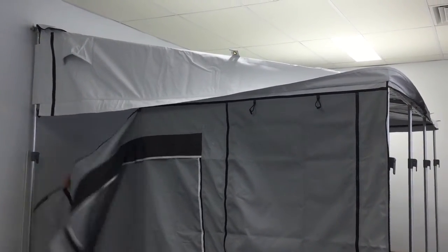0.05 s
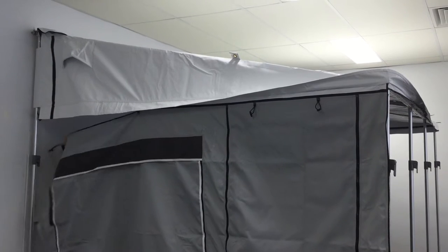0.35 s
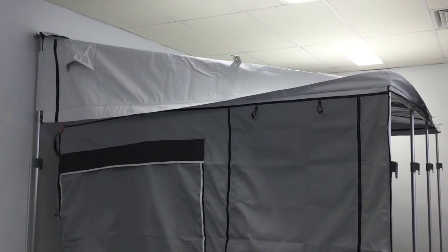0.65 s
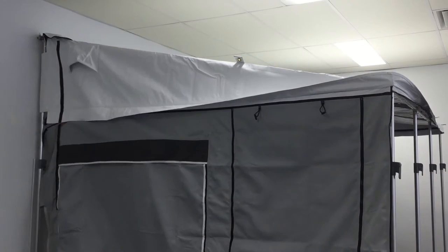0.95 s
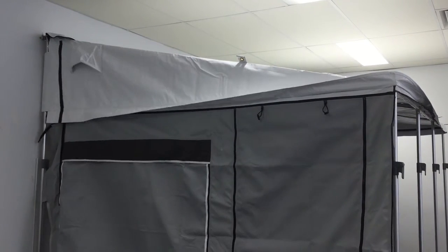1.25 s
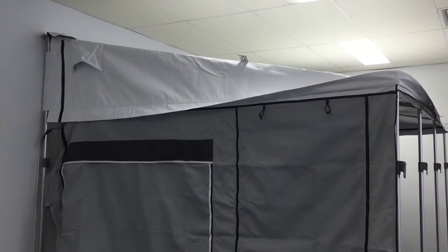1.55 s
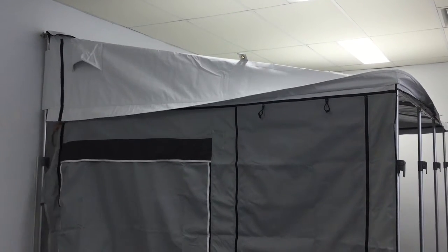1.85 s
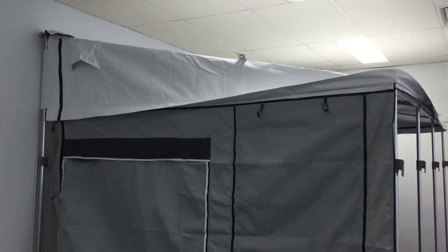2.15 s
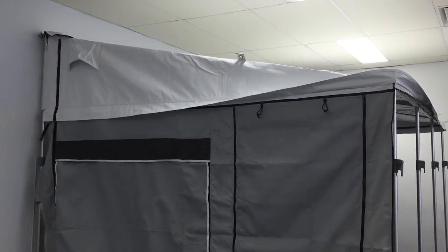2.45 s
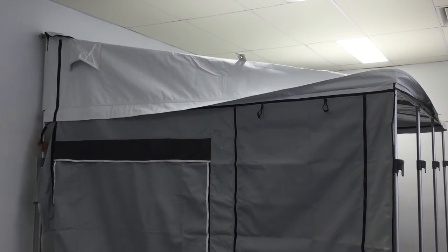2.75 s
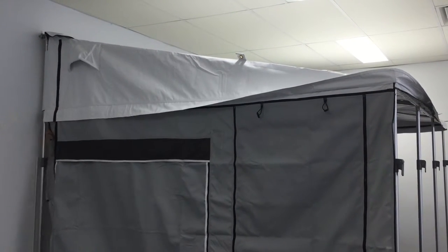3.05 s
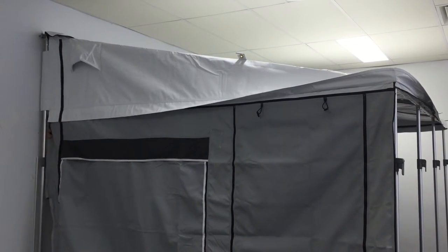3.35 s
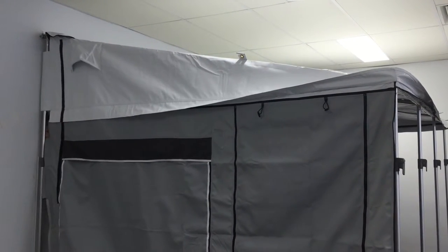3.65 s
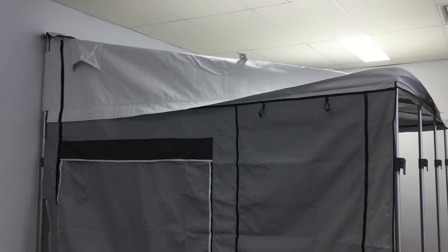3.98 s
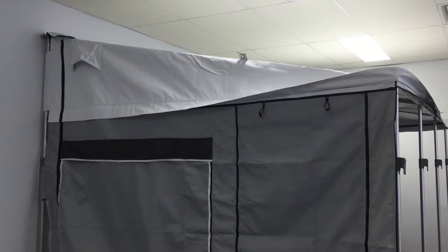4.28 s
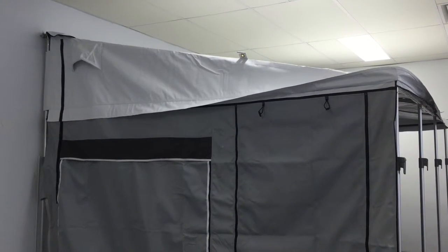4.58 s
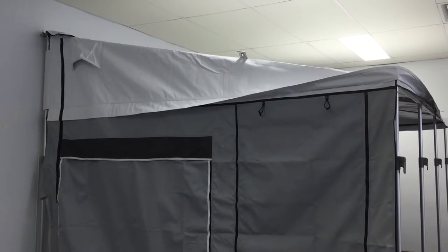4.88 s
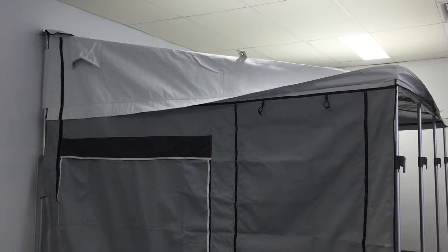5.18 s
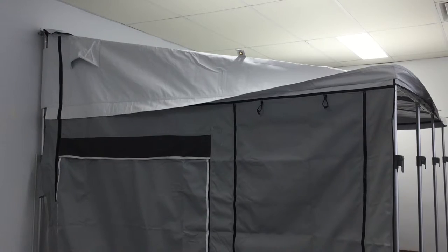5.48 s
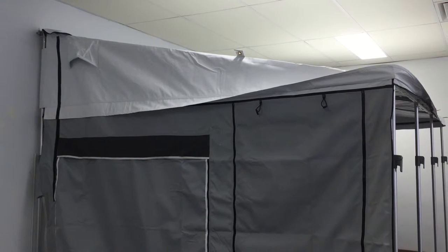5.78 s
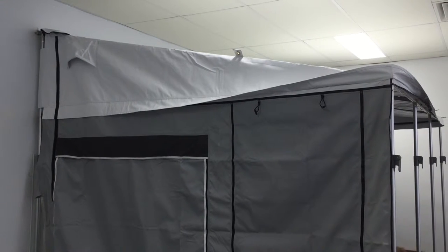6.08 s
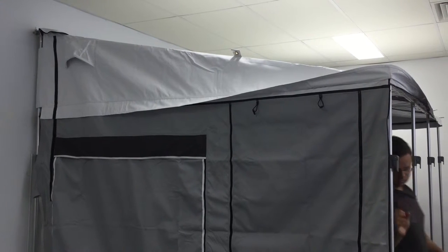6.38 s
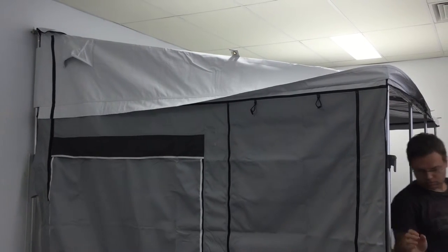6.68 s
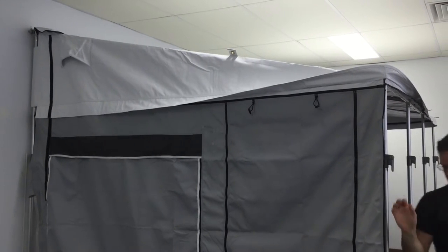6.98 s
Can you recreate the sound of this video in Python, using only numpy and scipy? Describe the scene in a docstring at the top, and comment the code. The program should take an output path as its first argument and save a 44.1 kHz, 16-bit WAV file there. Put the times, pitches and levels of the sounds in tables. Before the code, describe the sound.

A few metres away in a large room, a zip closes a canvas tent wall in three uneven pulls. The first is the longest and loudest, the second slow and quieter, the third speeds up. The stretched canvas buzzes while metal pull tabs jingle and clink and the cloth rustles. The tent frame takes one soft knock, then a small dry tick and light crinkles follow. Soft low thumps and faint ventilation rumble lie beneath.

```python
"""A zip closes a canvas tent wall in three uneven pulls, a few metres away in a large room.
The slider trips over the teeth and the stretched canvas radiates the buzz; two metal pull tabs jingle
and clink. The handled cloth rustles and crinkles, the frame takes one soft knock, and a small dry tick
follows. Beneath are soft low thumps, probably footsteps, and rumbling ventilation."""
import sys
import numpy as np
from scipy import signal
from scipy.fft import rfft, irfft, next_fast_len
from scipy.io import wavfile
from scipy.ndimage import uniform_filter1d, map_coordinates

SR = 44100
rng = np.random.default_rng(int(sys.argv[2]) if len(sys.argv) > 2 else 0)


def digitize_waveform(pressure):
    """Quantize a signal to 16-bit integers and store it at the path in sys.argv[1].

    Rows of a 2-D input are taken as channels; values are limited to [-1, 1].
    """
    field = np.atleast_2d(pressure).T
    bounded = np.clip(field, -1, 1)
    quanta = np.round(bounded * 32767).astype(np.int16)
    wavfile.write(sys.argv[1], SR, quanta)


N = 314433

# modes of held slider tab, second tab, free-hanging slider tab: f/Hz, level/dB, t60/s
TAB_MODES = [
    [(4924, -10.5, 0.23), (5050, -18, .04), (6360, -24, 0.1), (7000, -22, 0.12), (11600, -4.5, 0.24),
     (11620, 0.5, 0.19), (14815, -4, 0.22)],
    [(8233, -4, 0.33), (8330, -13, 0.14), (8320, -7, .1), (8570, -10, 0.098), (9160, -12.5, 0.12),
     (11200, -24, 0.15)],
    [(4854, -4.5, 0.32), (5835, -12, .09), (6240, -12, .14), (6990, -12, .14), (10100, -13, 0.072),
     (11500, -0.5, 0.19), (12800, -15, .06), (14760, -8, 0.24)],
]
# slack canvas panel response: f/Hz, level/dB
SLACK_PANEL = [(32, -21), (60, 3), (110, -0.5), (165, 0), (270, 2), (330, -1), (450, -9), (800, -10),
               (2000, -34.5), (4000, -73)]
# tooth rasp spectrum: f/Hz, level/dB
RASP_SPECTRUM = [(2200, -30.5), (3300, -6), (4300, -5), (6000, -2), (10400, -10), (12500, -11.5),
                 (15500, -8.5)]
TUG_RISE_DB_PER_S, RASP_FALL_DB_PER_S = 381, 236
SHAKE_HOLD_S, SHAKE_RISE_DB_PER_S = 0.0048, 901


def amp(db):
    """Decibels to gain."""
    return 10 ** (np.asarray(db) / 20)


def unit(x):
    """Scale to rms 1."""
    return x / np.sqrt(np.mean(x ** 2) + 1e-20)


def along(points, hz):
    """Interpolate (f/Hz, value) points over log frequency."""
    f, v = np.transpose(points)
    return np.interp(np.log(hz + 1), np.log(f + 1), v)


def wobble(rate_hz):
    """Smooth random curve, knots at rate_hz."""
    knots = rng.standard_normal(int(N * rate_hz / SR) + 4)
    return map_coordinates(knots, [np.arange(N) * rate_hz / SR])


def colour(x, spectrum):
    """Minimum-phase filter from (f/Hz, level/dB) points."""
    m = 2 * next_fast_len(len(x))
    cepstrum = irfft(np.log(amp(along(spectrum, np.fft.rfftfreq(m, 1 / SR)))), m)
    cepstrum[1:m // 2] *= 2
    cepstrum[m // 2 + 1:] = 0
    return irfft(rfft(x, m) * np.exp(rfft(cepstrum)), m)[:len(x)]


def noise(n, spectrum):
    """Coloured noise, rms 1."""
    return unit(colour(rng.standard_normal(n), spectrum))


def fade(t, t60_s):
    """Free decay, 60 dB down at t60_s."""
    return np.exp(-np.log(1000) * t / t60_s)


def swell(start_s, hold_s, rise_db_per_s, fall_db_per_s):
    """Gesture envelope: 1 from start_s for hold_s, flanks linear in dB."""
    corners_s = [start_s - 1, start_s, start_s + hold_s, start_s + hold_s + 1]
    return amp(np.interp(np.arange(N) / SR, corners_s, [-rise_db_per_s, 0, 0, -fall_db_per_s]))


def ring(modes, t, scatter_db):
    """Damped modes struck at randomised levels."""
    return sum(amp(db + scatter_db * rng.normal()) * fade(t, t60_s) * np.sin(2 * np.pi * hz * t)
               for hz, db, t60_s in modes)


def add(track, start_s, sound):
    """Mix sound into track at start_s."""
    part = track[round(start_s * SR):][:len(sound)]
    part += sound[:len(part)]


def grains(rate_hz, spread_db):
    """Random tiny contacts of uneven size, rms 1."""
    impulses = (rng.random(N) < rate_hz / SR) * rng.choice([-1, 1], N)
    return unit(impulses * amp(spread_db * np.clip(rng.standard_normal(N), -2, 2)))


def chatter(modes, rate_hz, damping_t60_s):
    """Modes with extra damping, kept ringing by random light contacts; rms 1."""
    out, t = np.zeros(N), np.arange(SR // 4) / SR
    contacts = rng.random(N) < rate_hz / SR
    for mode in modes:
        strikes = contacts * rng.standard_normal(N)
        out += signal.oaconvolve(strikes, ring([mode], t, 0) * fade(t, damping_t60_s))[:N]
    return unit(out)


def ventilation(level_db=-68):
    """Steady low rumble under faint hiss."""
    # moving air: f/Hz, level/dB
    air_spectrum = [(20, -46), (41, -25.5), (64, -3.5), (259, -21.5), (400, -23.5), (1000, -26.7),
                    (2050, -26.5), (2300, -28.5), (15400, -42)]
    return amp(level_db) * noise(N, air_spectrum)


def rustle(rustle_db=-9, scuff_db=-1.5, clump_db=2, loose_db=-57.5, loose_until_s=2.65):
    """Canvas rubs in clumps of fine grains; cloth and moving slider add short scuffs near 2 kHz."""
    # scuffs and scrapes of canvas and slider: t/s, level/dB, f/Hz
    scrapes = [(.74, -62.5, 1790), (.86, -45, 1840), (1.61, -58.5, 2380), (1.66, -63, 2017),
               (1.88, -65, 2002), (2.18, -50.5, 1780), (2.717, -60.5, 2020), (2.88, -69, 1780),
               (3.024, -60.5, 1630), (3.325, -46, 1970), (3.39, -47.5, 2005), (3.785, -63, 1997),
               (4.465, -60.5, 2220), (5.535, -70.5, 1300), (6.565, -68.5, 2840)]
    # scuff spectrum: multiple of scuff f, level/dB
    scuff_shape = [(.3, -21.5), (.8, -14), (1, -2), (1.25, -18.5), (3, -27.5), (8, -41)]
    # rubbing cloth: f/Hz, level/dB
    cloth_spectrum = [(150, 5.5), (400, -5), (1400, -4), (2000, -2), (3000, -13.5), (6000, -14),
                      (15000, -23.5)]
    flanks_db_per_s = 400, 340
    fibres = grains(rate_hz=1500, spread_db=2.5)
    rubbing = amp(loose_db) * swell(0, loose_until_s, *flanks_db_per_s)  # until the zip holds the wall
    scuffs = np.zeros(N)
    for s, db, hz in scrapes:
        stroke = amp(db) * swell(s, 0.015, *flanks_db_per_s)
        rubbing = np.maximum(rubbing, stroke)
        near = slice(round(s * SR) - SR // 5, round(s * SR) + SR // 4)
        scuffs[near] += stroke[near] * unit(colour(fibres[near], np.array(scuff_shape) * [hz, 1]))
    cloth = rubbing * unit(colour(fibres, cloth_spectrum))
    return amp(clump_db * wobble(22.11)) * (amp(rustle_db) * cloth + amp(scuff_db) * scuffs)


def thumps(centre_hz=72.6, sigma_s=0.018):
    """Soft low thumps, probably footsteps."""
    # thumps: t/s, level/dB
    thump_events = [(.115, -55.5), (.336, -54), (1.58, -51.5), (1.76, -55), (2.935, -58.5), (5.755, -60)]
    out, t = np.zeros(N), np.arange(N) / SR
    for s, db in thump_events:
        hz = centre_hz * np.exp(0.12 * rng.normal())
        envelope = np.exp(-((t - s) / sigma_s) ** 2 / 2)
        out += amp(db) * envelope * np.sin(2 * np.pi * (hz * (t - s) + rng.random()))
    return out


def crinkles(snap_db=-10, flap_db=-13, rise_s=0.0017, t60_s=0.13):
    """A crease gives way: papery snap, short crack, low flap."""
    # creases: t/s, level/dB, centre f/Hz, flap offset/dB
    creases = [(.331, -56.5, 885, 13), (1.598, -37, 2150, -30), (1.917, -39, 1550, -10),
               (3.184, -32.5, 1640, -28), (4.188, -49, 1773, -7), (4.46, -51, 2240, 8.5),
               (5.365, -51, 1370, -9), (5.975, -49, 1100, -2.5), (6.008, -52, 3980, -4),
               (6.548, -47.5, 1500, -24)]
    out, t = np.zeros(N), np.arange(SR // 4) / SR
    for s, db, hz, offset_db in creases:
        spectrum = [(hz * 0.39, -18), (hz * 0.86, -6), (hz, 0), (hz * 1.19, -7),
                    (hz * 1.73, -20), (hz * 3, -27), (16000, -46)]
        snap = noise(len(t), spectrum) * fade(t, t60_s)
        crack = colour(rng.standard_normal(len(t)) * fade(t, 0.031), spectrum)
        flap = noise(len(t), SLACK_PANEL) * fade(t, t60_s)
        pop = amp(snap_db) * snap + crack / np.abs(crack).max() + amp(flap_db + offset_db) * flap
        add(out, s, amp(db) * pop * (1 - np.exp(-t / rise_s)))
    return out


def tooth_rate_hz():
    """Teeth passing the slider per second, at each sample."""
    # slider speed, one list per pull: t/s, tooth rate/Hz
    pulls = [
        [(.78, 190), (.83, 215), (.865, 260), (.96, 300), (1.01, 274), (1.045, 312), (1.1, 368), (1.135, 338),
         (1.18, 362), (1.22, 330), (1.3, 295), (1.38, 140), (1.54, 72)],
        [(1.9, 73), (2.1, 86), (2.18, 119), (2.27, 106), (2.38, 92)],
        [(3.1, 95), (3.27, 120), (3.39, 172), (3.478, 155), (3.495, 254), (3.54, 260), (3.58, 284), (3.76, 177)],
    ]
    return np.interp(np.arange(N) / SR, *np.concatenate(pulls).T)


def tugging(thrum_fall_db_per_s=120, buzz_fall_db_per_s=157):
    """Zip gains and roughness: the strongest tug leads; as the hand eases, the highs go first."""
    # tugs within the pulls: t/s, hold/s, thrum/dB, buzz/dB, rasp/dB, roughness
    tugs = [(0.808, 0.021, -40.5, -39.5, -48, 0.74), (0.849, 0.018, -41.5, -33.5, -46.5, 0.64),
            (0.937, 0.045, -40, -41.5, -45.5, 0.67), (1.019, 0.055, -43, -39, -46, 0.41),
            (1.073, 0.14, -43, -36.5, -45, 0.4), (1.219, 0.031, -34, -30, -42, 0.83),
            (1.273, 0.014, -36, -31, -46.5, 0.79), (1.334, 0.022, -42.5, -48, -53, 1.06),
            (1.45, 0.028, -55, -53.5, -94, 0.98), (1.542, 0.018, -58, -58, -60, 0.8),
            (1.928, .012, -51.5, -54.5, -71, 1.04), (2.021, 0.051, -48.5, -50, -72, .9),
            (2.095, 0.075, -49, -44.5, -70, .75), (2.155, 0.058, -49, -44.5, -61.5, 0.55),
            (2.26, 0.0084, -53, -52, -67, 0.64), (3.133, 0.025, -56, -55, -82, 0.83),
            (3.186, 0.021, -52.5, -53, -61, 0.88), (3.314, 0.12, -50, -49, -55.5, 0.6),
            (3.494, 0.085, -43.5, -47.5, -46, 0.77)]
    thrum, buzz, rasp, weight, rough = np.zeros((5, N))
    for s, hold_s, thrum_db, buzz_db, rasp_db, roughness in tugs:
        force = amp(buzz_db) * swell(s, hold_s, TUG_RISE_DB_PER_S, buzz_fall_db_per_s)
        low = amp(thrum_db) * swell(s, hold_s, TUG_RISE_DB_PER_S, thrum_fall_db_per_s)
        high = amp(rasp_db) * swell(s, hold_s, 0.83 * TUG_RISE_DB_PER_S, RASP_FALL_DB_PER_S)
        thrum, buzz, rasp = np.maximum(thrum, low), np.maximum(buzz, force), np.maximum(rasp, high)
        weight += force ** 2
        rough += roughness * force ** 2
    return thrum, buzz, rasp, np.clip(rough / weight, 0, 1)


def zipper(thrum_gain, buzz_gain, rasp_gain, rough, jitter=0.09, tooth_spread_db=1.5, scrape_db=7):
    """Each tooth drives the canvas with a tick and a short scrape."""
    # taut panel response: f/Hz, level/dB
    taut_panel = [(50, -16.5), (100, -4), (270, 2), (550, -0.5), (1300, -9.5), (6500, -69.5)]
    # canvas buzz: f/Hz, level/dB
    buzz_spectrum = [(200, -33.5), (450, -12.5), (620, 4), (740, 3.5), (830, -2), (1250, 1.5), (1800, 1),
                     (2200, -4), (2900, -13), (9000, -66)]
    rate_hz = tooth_rate_hz()
    travel = np.cumsum(rate_hz * (1 + jitter * rough * wobble(130))) / SR
    tooth = travel.astype(int)
    size = amp(tooth_spread_db * rough * rng.standard_normal(N)[tooth])
    ticks = unit(np.diff(tooth, prepend=0) * size / np.sqrt(rate_hz))
    scrape = unit(size * np.exp(-(travel % 1) / 2.2) * rng.standard_normal(N))
    friction = amp(scrape_db) * rough
    drive = (ticks + friction * scrape) / np.hypot(1, friction)
    drive -= uniform_filter1d(drive, size=SR // 50)  # steady push is silent
    taut = np.clip((rate_hz - 130) / 130, 0, 1)  # a fast pull tightens the panel
    thrum = (1 - taut) * unit(colour(drive, SLACK_PANEL)) + taut * unit(colour(drive, taut_panel))
    buzz = unit(colour(drive, buzz_spectrum))
    rasp = unit(colour(0.18 * ticks + scrape, RASP_SPECTRUM))
    snag = amp(1.52 * wobble(45))  # slider catches and frees itself
    return snag * (amp(-1) * thrum_gain * thrum + buzz_gain * buzz + amp(-1) * rasp_gain * rasp)


def jingle(rasp_gain, teeth_db=-8, jingle_db=-3, scratch_db=-11, swing_db=1.5):
    """The held tab chatters on the slider, which damps it; gentle shaking favours its lowest modes."""
    # shakes of the tab: t/s, bright jingle/dB, low ring/dB
    shakes = [(.829, -39, -60), (.953, -42, -48), (1.3, -37.5, -51), (1.385, -52.5, -61), (1.667, -74, -67),
              (1.94, -72, -65), (2.072, -72, -61), (2.1, -53.5, -54), (2.185, -53.5, -70), (2.24, -64, -60),
              (2.29, -65.5, -65.5), (3.285, -61, -57), (3.385, -54.5, -56), (3.6, -40.5, -51),
              (3.7, -66, -64)]
    bright_gain, low_gain = amp(teeth_db) * rasp_gain, np.zeros(N)  # passing teeth keep it trembling
    for s, bright_db, low_db in shakes:
        burst = swell(s, SHAKE_HOLD_S, SHAKE_RISE_DB_PER_S, fall_db_per_s=231)
        bright_gain = np.maximum(bright_gain, amp(bright_db) * burst)
        low_gain = np.maximum(low_gain, amp(low_db) * burst)
    bright = chatter(TAB_MODES[0], rate_hz=400, damping_t60_s=0.06)
    bright += amp(scratch_db) * unit(colour(grains(rate_hz=260, spread_db=3.5), RASP_SPECTRUM))
    low = chatter(TAB_MODES[0][:2], rate_hz=500, damping_t60_s=0.16)
    return amp(swing_db * wobble(25)) * (amp(jingle_db) * bright_gain * bright + low_gain * low)


def drone(trim_db=-0.5, jitter=0.024, flutter_db=3, scatter_rad=0.5):
    """In a smooth glide the whole panel flexes at the tooth rate; overtones grow with speed."""
    # smooth glides: t/s, hold/s, fundamental/dB, octave offset/dB
    glides = [(.835, .035, -52, 5), (1, .03, -41, -9), (1.04, .075, -43.5, 2), (1.155, .03, -42, -6),
              (2.17, .1, -49, -8), (3.315, .12, -48, -18), (3.497, .02, -46, -16), (3.555, .025, -46.5, -4)]
    # panel overtones at top speed: harmonic number, level/dB
    overtones = [(3, -10), (4, 0.5), (5, -1), (6, -4.5), (7, -10)]
    rate_hz = tooth_rate_hz()
    phase = 2 * np.pi * np.cumsum(rate_hz * (1 + jitter * wobble(90))) / SR
    low_gain, octave_gain = np.zeros((2, N))
    for s, hold_s, db, octave_db in glides:
        gain = amp(db) * swell(s, hold_s, TUG_RISE_DB_PER_S, RASP_FALL_DB_PER_S)
        low_gain = np.maximum(low_gain, gain)
        octave_gain = np.maximum(octave_gain, amp(octave_db) * gain)

    def partial(k):
        flutter = np.sqrt(2) * amp(flutter_db * wobble(90))
        return flutter * np.sin(k * phase + scatter_rad * wobble(140) + rng.uniform(0, 2 * np.pi))

    upper = sum(amp(db) * partial(k) for k, db in overtones) * (rate_hz / rate_hz.max()) ** 4
    return amp(trim_db) * (low_gain * (partial(1) + upper) + octave_gain * partial(2))


def clinks(ring_db=-11, waver_db=3):
    """A tab strikes the slider: bright crack, then a free ring that wavers as the tab swings."""
    # strikes: t/s, level/dB, row of TAB_MODES, lowest-mode offset/dB
    strikes = [(0.896, -33.5, 1, -5), (.95, -42, 0, 9), (1.232, -31, 0, -14), (1.548, -41.5, 0, -7),
               (2.472, -27.5, 1, -1.5), (2.498, -32, 1, -2), (3.337, -35.5, 0, 0), (3.589, -33, 0, 4),
               (4.041, -41.5, 2, -3), (4.179, -51, 2, -8), (4.617, -48, 2, -8.5)]
    # contact hardness per row of TAB_MODES: level/dB
    crack_db = [-18, -15, -18]
    crack_spectrum = [(1500, -7.5), (4000, -13), (6000, -2), (8500, -0.5), (15000, -4)]
    out, t = np.zeros(N), np.arange(SR // 2) / SR
    for s, db, tab, offset_db in strikes:
        modes = np.array(TAB_MODES[tab], float)
        modes[0, 1] += offset_db
        crack = noise(len(t), crack_spectrum) * fade(t, 0.074)
        waver = amp(waver_db * wobble(155)[:len(t)])
        tone = ring(modes, t, scatter_db=2)
        add(out, s, amp(db) * (amp(ring_db) * waver * tone + amp(crack_db[tab]) * crack))
    return out


def nudges():
    """A few teeth scratch through the slider as the hand changes grip."""
    # slider jostles: t/s, level/dB
    jostles = [(1.6, -64), (1.655, -63.5), (1.925, -59), (3.055, -70)]
    gain = sum(amp(db) * swell(s, SHAKE_HOLD_S, SHAKE_RISE_DB_PER_S, 400) for s, db in jostles)
    spectrum = [(2000, -28), (5500, 4), (7200, 0), (10000, -13)]
    return gain * unit(colour(grains(rate_hz=630, spread_db=4), spectrum))


def frame_knock(start_s=3.863, ring_db=-33, slap_db=-48, flap_db=-47, smother_s=0.088):
    """A padded knock rings the frame and slaps the canvas, which smothers the ring and flaps on."""
    # modes of the canvas-covered frame: f/Hz, level/dB, t60/s
    frame_modes = [(240, -11, .1), (278, -5.5, 0.21), (517, -13.5, 0.14), (684, -12, 0.16),
                   (1025, -4, 0.036), (1287, -21, 0.11), (1826, -12, 0.03)]
    slap_spectrum = [(100, -20), (260, -3), (660, -3.5), (800, -13),
                     (1000, 2), (1150, -9), (2100, -14), (3500, -35.5)]
    flap_spectrum = [(60, -12), (190, 0.5), (290, 0), (380, -10), (680, -9), (2500, -37), (5000, -65)]
    out, t = np.zeros(N), np.arange(SR // 2) / SR
    slap = noise(len(t), slap_spectrum) * fade(t, 0.27)
    flap = noise(len(t), flap_spectrum) * fade(t, 0.46) * (1 - np.exp(-t / 0.027))
    tone = ring(frame_modes, t, scatter_db=1) * np.exp(-(t / smother_s) ** 4)
    knock = amp(ring_db) * tone + amp(slap_db) * slap + amp(flap_db) * flap
    add(out, start_s, knock * (1 - np.exp(-t / 0.0019)))
    return out


def dangle(start_s=4.043, hold_s=0.16, level_db=-57, loss_db_per_s=35):
    """The released tab clatters on the slider, ever more weakly, and comes to rest."""
    loss = amp(-loss_db_per_s * np.maximum(np.arange(N) / SR - start_s, 0))
    gain = amp(level_db) * loss * swell(start_s, hold_s, SHAKE_RISE_DB_PER_S, fall_db_per_s=170)
    return gain * chatter(TAB_MODES[2], rate_hz=1200, damping_t60_s=0.025)


def tick(start_s=4.921, level_db=-46, t60_s=0.018):
    """One small dry tick."""
    out, t = np.zeros(N), np.arange(SR // 8) / SR
    plastic = [(1000, -31), (1900, -5), (2500, 12), (3200, -15), (14000, -24)]
    add(out, start_s, amp(level_db) * noise(len(t), plastic) * fade(t, t60_s))
    return out


def room(x, wet_db, segments=24):
    """Direct sound plus crossfaded diffuse tails that change as the source moves; power is kept."""
    # room decay: f/Hz, t60/s
    decay_times = [(100, 0.57), (400, 0.68), (2000, 0.43), (14000, 0.3)]
    wet, hop = np.zeros(N), N // segments
    for centre in range(0, N + hop, hop):
        span = np.arange(max(centre - hop, 0), min(centre + hop, N))
        hz, t, bins = signal.stft(rng.standard_normal(SR // 2), SR, nperseg=256)
        tail = signal.istft(bins * fade(t, along(decay_times, hz)[:, None]), SR, nperseg=256)[1]
        if len(span):
            share = np.cos(np.pi / 2 * (span - centre) / hop)
            add(wet, span[0] / SR, signal.fftconvolve(x[span] * share, tail / np.linalg.norm(tail)))
    return (x + amp(wet_db) * wet) / np.sqrt(1 + amp(2 * wet_db))


def scene():
    """Mono mix: the sliding zip is the most reverberant; single contacts stand out more."""
    thrum_gain, buzz_gain, rasp_gain, rough = tugging()
    sliding = room(zipper(thrum_gain, buzz_gain, rasp_gain, rough) + drone(), wet_db=-5.5)
    contacts = room(clinks() + frame_knock() + jingle(rasp_gain) + dangle() + nudges(), wet_db=-10)
    cloth = room(rustle() + crinkles(), wet_db=-7)
    return (sliding + contacts + cloth + thumps() + tick() + ventilation())[None]


def record(dry):
    """Brick-wall low-pass."""
    cutoff_hz = 15550
    m = next_fast_len(N + SR // 2)
    return irfft(rfft(dry, m) * (np.fft.rfftfreq(m, 1 / SR) < cutoff_hz), m)[..., :N]


dry = scene()
out = record(dry)
digitize_waveform(out)
```